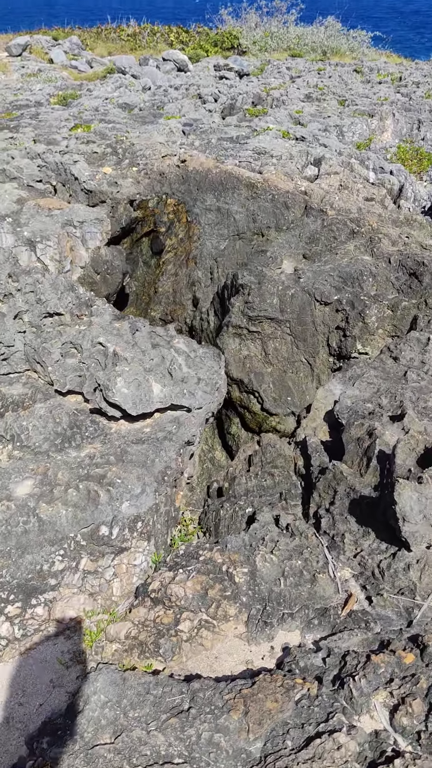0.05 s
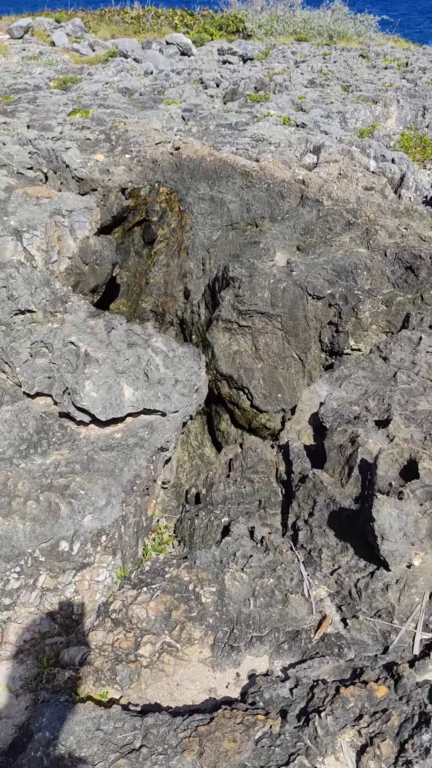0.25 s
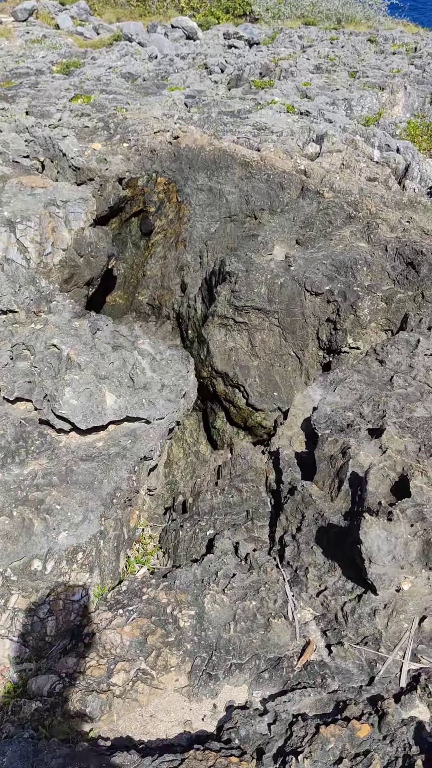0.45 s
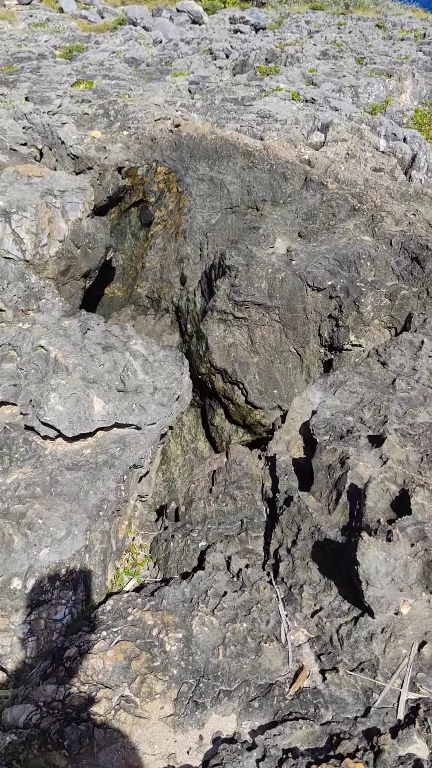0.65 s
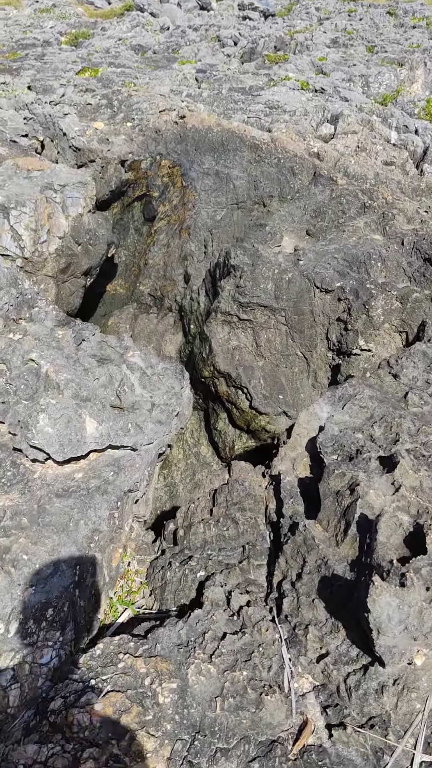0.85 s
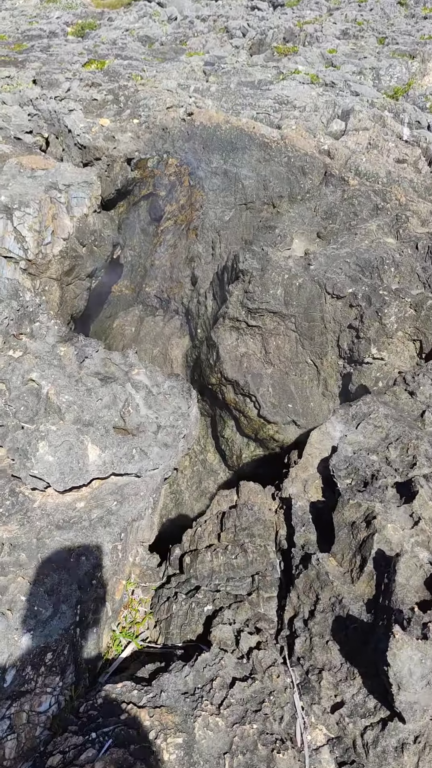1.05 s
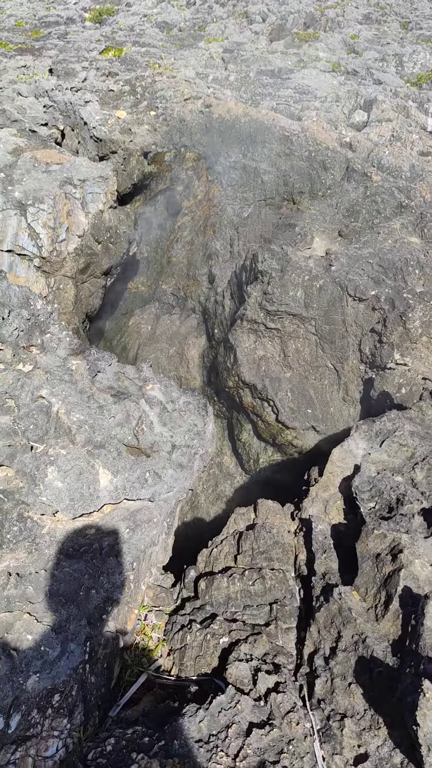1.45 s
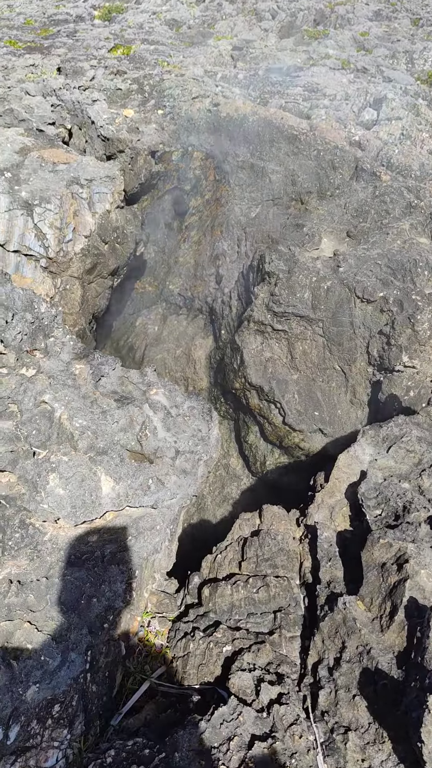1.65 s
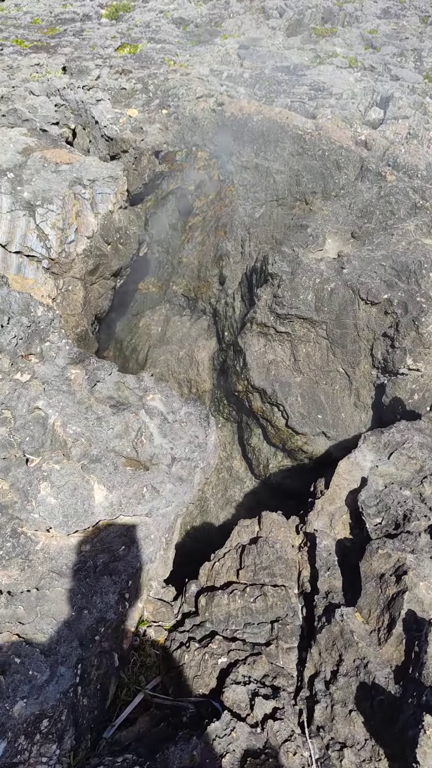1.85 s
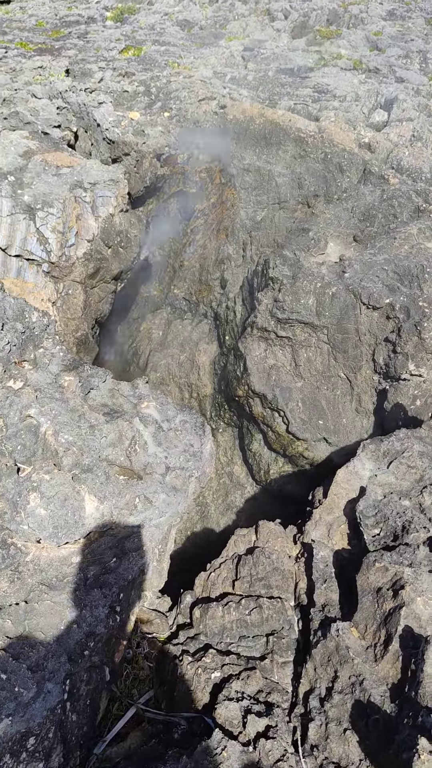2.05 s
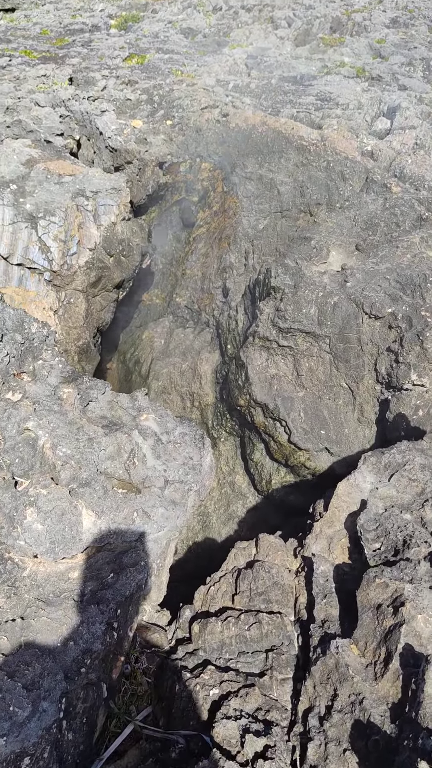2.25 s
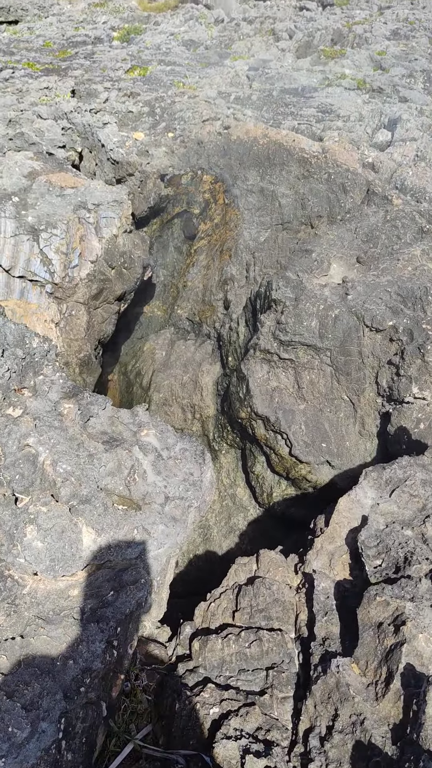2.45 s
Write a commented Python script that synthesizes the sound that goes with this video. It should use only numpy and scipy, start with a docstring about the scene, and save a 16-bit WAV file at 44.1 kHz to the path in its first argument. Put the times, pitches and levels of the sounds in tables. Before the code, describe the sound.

Air and spray roar out of a rock crevice, swelling and fading over low surf rumble.

```python
"""Sea cave blowhole

A swell runs into a sea cave and drives air and spray out of a crevice in the rock above.
Air thumps, the cave booms, the slot roars in its resonances and the jet hisses with fine droplets,
swelling for a second, then slowly easing. Grit ticks at the start; surf and wind rumble underneath."""
import sys
import numpy as np
from scipy.fft import rfft, irfft
from scipy.io import wavfile
from scipy.ndimage import uniform_filter1d

SR = 44100
rng = np.random.default_rng(int(sys.argv[2]) if len(sys.argv) > 2 else 0)


def master_out(mix):
    """Clip the mix to full scale and print it as 16-bit PCM to the path in sys.argv[1]."""
    frames = np.transpose(np.atleast_2d(mix))
    ceiling = np.clip(frames, -1, 1)
    pcm = np.round(ceiling * 32767).astype(np.int16)
    wavfile.write(sys.argv[1], SR, pcm)


N = 114660
TIME_S = np.arange(N) / SR
FREQ_HZ = np.maximum(np.arange(N // 2 + 1) * SR / N, 1)

# strength of the blow, as hiss level: t/s, level/dB
FLOW_LEVEL = [(0, -58.5), (0.17, -53.5), (0.28, -47.5), (0.4, -38.5), (0.52, -32.5), (0.66, -27),
              (0.78, -24), (0.87, -22.5), (0.97, -22.4), (1.1, -24), (1.25, -22.5), (1.38, -23.5),
              (1.52, -27), (1.68, -30.5), (1.97, -31), (2.2, -34.5), (2.38, -37.0), (2.48, -40.5),
              (2.6, -44)]
# roar in the slot: t/s, level/dB
ROAR_LEVEL = [(0, -52.5), (0.15, -50.5), (0.28, -42), (0.38, -34.5), (0.48, -27.5), (0.6, -24),
              (0.7, -19.5), (0.8, -19), (0.9, -17), (1.08, -19.5), (1.22, -17), (1.36, -18), (1.5, -21),
              (1.65, -24), (1.95, -26), (2.25, -31), (2.42, -34), (2.6, -39)]
# top of the hiss, from the finest mist: t/s, gain/dB
MIST_GAIN = [(0, -10), (.35, -1.5), (.68, 3), (1.1, -1.2), (2.6, -0.4)]
# escaping air: f/Hz, left/dB, right/dB
AIR_SPECTRUM = [(350, -51, -45.5), (445, -46.5, -52), (794, -53, -48.5), (990, -54.5, -58),
                (1280, -58, -58.5), (1990, -55.5, -57.5), (2560, -61, -61), (3120, -60.5, -63),
                (5030, -66, -66.5), (6450, -69.5, -69.5), (7450, -65, -81), (7870, -63, -82),
                (9400, -62.5, -93), (11370, -70, -75), (13800, -71, -84.5), (15700, -80, -75)]
# slot resonances: f/Hz, width/Hz, left lift/dB, right lift/dB
SLOT_MODES = [(608, 152, 4.5, 3), (923, 100, 3, 2.5), (1139, 173, 5, 4), (1462, 152, 3.3, 6),
              (1738, 270, -1, 10.5), (1988, 100, 0, 3), (2365, 89, -3.3, 4), (2830, 76, -0.5, 3),
              (3200, 110, 1, 5.5), (3490, 170, 1, 5.5), (3810, 170, -2.8, 4.5), (4380, 240, 1.2, 1),
              (5770, 920, -1.5, 4), (8427, 1060, 7, 4), (9820, 1200, 2.5, -7)]
# resonance depth, flooded then drained: t/s, lift factor
SLOT_DEPTH = [(.7, 0.98), (1.6, 1.25)]
# cave boom: t/s, level/dB
BOOM_LEVEL = [(0, -48), (.1, -38), (.22, -30), (.32, -31), (.42, -24), (.55, -20), (.68, -17), (.8, -14.5),
              (1.0, -12.5), (1.15, -15.5), (1.36, -13.5), (1.52, -16), (1.63, -21.5), (1.85, -22),
              (1.95, -20.5), (2.2, -24), (2.38, -24.5), (2.48, -33), (2.6, -31.5)]
# cave boom: f/Hz, level/dB
BOOM_SPECTRUM = [(50, -53), (72, -6.5), (96, 4), (128, -5.5), (168, -2), (208, -0.5), (250, -5), (295, -7),
                 (340, -18.5), (480, -25.5), (1200, -86)]
# hollow thumps of gusting air: t/s, level/dB, f/Hz, right minus left/dB
THUMPS = [(.206, -22, 184, 16), (.361, -18, 150, 9), (.407, -14, 161, 18), (.411, -11, 257, 17),
          (.414, -18, 397, 16), (.49, -14, 148, 18), (.557, -18.5, 546, 13), (.56, -20, 948, 11),
          (2.032, -12, 115, 0)]
# grit ticks on the rock: t/s, level/dB
TICKS = [(.042, -54.5), (.071, -36), (0.085, -43), (.136, -48)]
# grit tick: f/Hz, level/dB
TICK_SPECTRUM = [(200, -7), (750, 6), (2500, -2), (6000, -16), (14000, -32)]
# wind and surf rumble: t/s, level/dB
RUMBLE_LEVEL = [(0, -41), (.15, -42), (.35, -37), (.62, -25), (.83, -14), (1.0, -26), (1.22, -21),
                (1.45, -26), (1.7, -26), (2.1, -26.5), (2.5, -38), (2.6, -34)]
# wind and surf rumble: f/Hz, level/dB
RUMBLE_SPECTRUM = [(12, -4), (25, 6), (42, 14.5), (60, 19), (80, 0.5), (140, -61), (600, -90)]
# wind at each ear: t/s, left/dB, right/dB
BUFFET_LEVEL = [(0, -48, -35.5), (.45, -29, -17), (.8, -27, -24), (1.5, -37, -41), (2.6, -40, -35.5)]
# wind at each ear: f/Hz, level/dB
BUFFET_SPECTRUM = [(15, -24), (40, -3.5), (90, 1), (180, 0), (300, -12), (700, -29), (3000, -87)]
# likeness of the two sides: f/Hz, coherence, left lead/rad
STEREO_IMAGE = [(40, 1, -0.5), (226, 1, 0.27), (430, .7, 0.68), (604, 1, -1.94), (795, 0.81, 0.85),
                (890, 0.7, 1.35), (1080, 0.96, 0.84), (1610, 0.6, 0.13), (2080, 0.76, 2), (2420, 0.9, 2),
                (2750, 0.3, 2), (2900, 0.28, 2.5), (3790, 0.36, 3), (4030, 0.2, 4), (4660, 0.16, 5),
                (5140, 1, 3.5), (5860, 0, 10.5), (6950, 0.2, 9)]


def from_db(db):
    """Decibels to gain."""
    return 10 ** (np.asarray(db) / 20)


def unit_rms(x):
    """Scale to unit power."""
    return x / np.sqrt(np.mean(x ** 2) + 1e-20)


def in_time(rows):
    """Curve at every sample."""
    return np.interp(TIME_S, *np.transpose(rows))


def in_hz(rows):
    """Table columns at every bin, interpolated in log frequency."""
    hz, *columns = np.transpose(rows)
    return np.array([np.interp(np.log(FREQ_HZ), np.log(hz), c) for c in columns])


def highpass(hz, order=6):
    """Butterworth gain at every bin."""
    return 1 / np.sqrt(1 + (hz / FREQ_HZ) ** (2 * order))


def drift(rate_hz):
    """Low-passed noise, unit RMS."""
    return unit_rms(irfft(rfft(rng.standard_normal(N)) / (1 + (FREQ_HZ / rate_hz) ** 2), N))


def stereo(pair, gain):
    """Colour two independent signals, set their coherence and phase; unit RMS."""
    coherence, lead_rad = in_hz(STEREO_IMAGE)
    coherence = np.clip(coherence, 0, .99)
    sign = np.array([[1], [-1]])
    mid, side = rfft(pair)
    both = np.sqrt(1 + coherence) * mid + sign * np.sqrt(1 - coherence) * side
    return unit_rms(irfft(both * gain * np.exp(.5j * sign * lead_rad), N))


def turbulence(gain, even_s):
    """Coloured stereo noise, level steady over spans longer than even_s."""
    noise = stereo(rng.standard_normal((2, N)), gain)
    power = uniform_filter1d(np.mean(noise ** 2, axis=0), int(even_s * SR))
    return noise / np.sqrt(power + 1e-9)


def jet(roar_low_hz=298, hiss_low_hz=2120, mist_low_hz=9200, air_trim_db=0.5,
        roar_flutter_db=0.9, hiss_flutter_db=0.61, sputter_db=0.1):
    """Roar, hiss and droplets leave the slot together and share one flutter."""
    flutter = drift(rate_hz=20)
    flow_db = in_time(FLOW_LEVEL)
    hiss_band = highpass(hiss_low_hz)
    roar_band = highpass(roar_low_hz) * np.sqrt(1 - hiss_band ** 2)
    roar = slot_air(roar_band, even_s=0.079)
    waver_db = roar_flutter_db * flutter + sputter_db * drift(rate_hz=90)
    roar *= from_db(in_time(ROAR_LEVEL) + air_trim_db + waver_db)
    hiss = slot_air(hiss_band, even_s=0.028) * from_db(air_trim_db) + droplets(flow_db, hiss_band)
    mist = irfft(rfft(hiss) * highpass(mist_low_hz), N)
    hiss = hiss - mist + mist * from_db(in_time(MIST_GAIN))
    return roar + hiss * from_db(flow_db + hiss_flutter_db * flutter)


def slot_air(band, even_s):
    """Turbulence in one band; the slot rings more clearly as it drains."""
    (flooded_s, flooded_depth), (drained_s, drained_depth) = SLOT_DEPTH
    flooded = turbulence(slot_colour(flooded_depth) * band, even_s)
    drained = turbulence(slot_colour(drained_depth) * band, even_s)
    blend = np.interp(TIME_S, [flooded_s, drained_s], [0, 1])
    return np.sqrt(1 - blend) * flooded + np.sqrt(blend) * drained


def slot_colour(depth):
    """Air spectrum as gain, shaped by the slot resonances."""
    db = in_hz(AIR_SPECTRUM)
    for hz, width_hz, left_db, right_db in SLOT_MODES:
        bell = .5 ** ((2 * (FREQ_HZ - hz) / width_hz) ** 2)
        db += depth * np.array([[left_db], [right_db]]) * bell
    return from_db(db)


def droplets(flow_db, band, peak_per_s=2500, spread_db=2.5, gain_db=-11.0):
    """Tiny impacts of spray, denser with the flow."""
    rate_per_s = peak_per_s * from_db((flow_db - flow_db.max()) / 2)
    hits = rng.random((2, N)) < rate_per_s / SR
    sizes = from_db(spread_db * np.minimum(rng.exponential(1, (2, N)), 4))
    signs = rng.choice([-1, 1], (2, N))
    return stereo(hits * sizes * signs, slot_colour(depth=0.94) * band) * from_db(gain_db)


def cave_boom(throb_db=1.0):
    """Air in the cave booms and throbs as the water churns."""
    boom = turbulence(from_db(in_hz(BOOM_SPECTRUM)), even_s=0.048)
    return boom * from_db(in_time(BOOM_LEVEL) + throb_db * drift(rate_hz=52))


def air_thumps(attack_s=0.0032, decay_s=0.012, rise_per_s=1.9, wobble_rad=0.62):
    """Each puff rings for a few cycles, rising and wobbling in pitch."""
    out = np.zeros((2, N))
    for start_s, db, hz, pan_db in THUMPS:
        age_s = np.maximum(TIME_S - start_s, 0)
        envelope = (1 - np.exp(-age_s / attack_s)) * np.exp(-age_s / decay_s)
        phase_rad = 2 * np.pi * hz * age_s * (1 + rise_per_s * age_s / 2)
        ring = np.sin(phase_rad + wobble_rad * drift(hz / 6))
        out += from_db([[db - pan_db / 2], [db + pan_db / 2]]) * envelope * ring
    return out


def grit_ticks(decay_s=0.0053):
    """Short dry crunches of grit on the rock."""
    envelope = sum(from_db(db) * (TIME_S > start_s) * np.exp(-np.abs(TIME_S - start_s) / decay_s)
                   for start_s, db in TICKS)
    return envelope * stereo(rng.standard_normal((2, N)), from_db(in_hz(TICK_SPECTRUM)))


def wind_and_surf():
    """Low lumpy rumble; wind also buffets each ear separately."""
    times_s, *ears_db = np.transpose(BUFFET_LEVEL)
    noise = rng.standard_normal((2, N))
    buffet = unit_rms(irfft(rfft(noise) * from_db(in_hz(BUFFET_SPECTRUM)), N))
    buffet *= from_db([np.interp(TIME_S, times_s, db) for db in ears_db])
    rumble = turbulence(from_db(in_hz(RUMBLE_SPECTRUM)), even_s=0.156)
    return rumble * from_db(in_time(RUMBLE_LEVEL)) + buffet


def scene():
    """Blowhole and surroundings."""
    return jet() + cave_boom() + air_thumps() + grit_ticks() + wind_and_surf()


def record(dry, ceiling=1.8, cutoff_hz=15800):
    """Soft clip, then brick-wall low-pass."""
    rounded = ceiling * np.tanh(dry / ceiling)
    passband = rfft(rounded, 2 * N)[:, :int(2 * N * cutoff_hz / SR)]
    return irfft(passband, 2 * N)[:, :N]


dry = scene()
out = record(dry)
master_out(out)
```